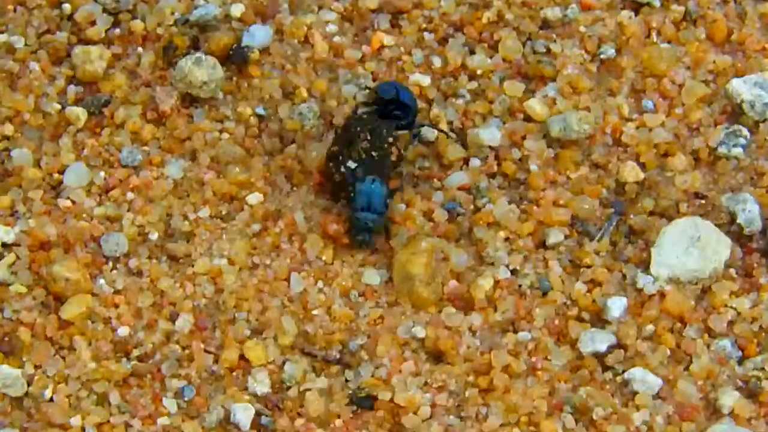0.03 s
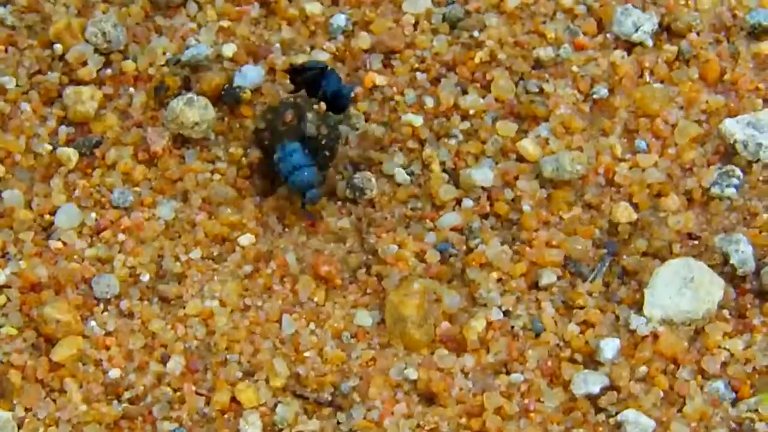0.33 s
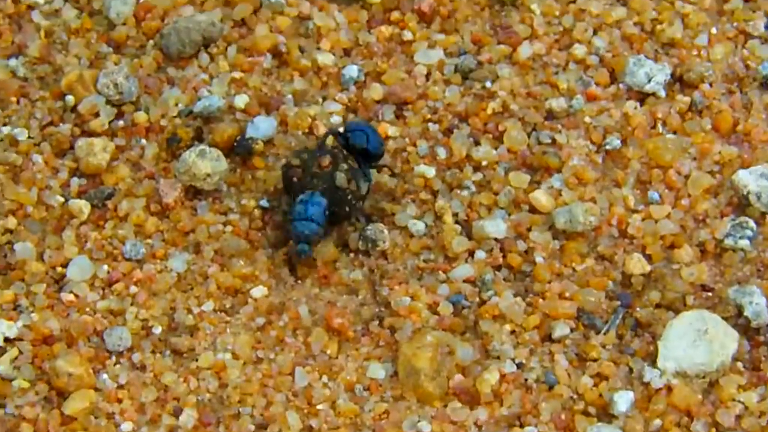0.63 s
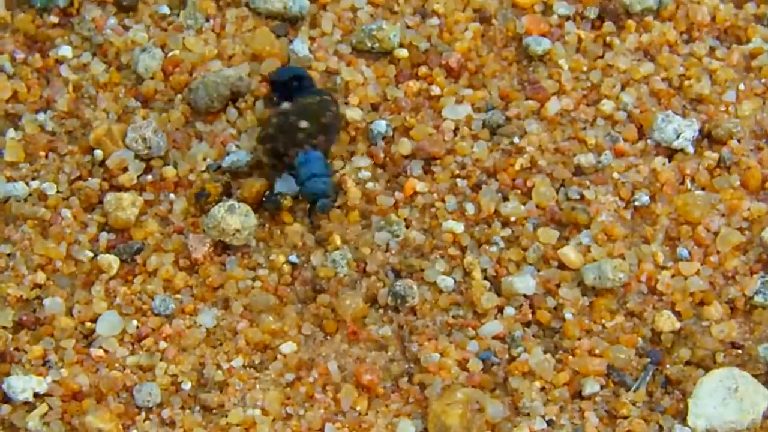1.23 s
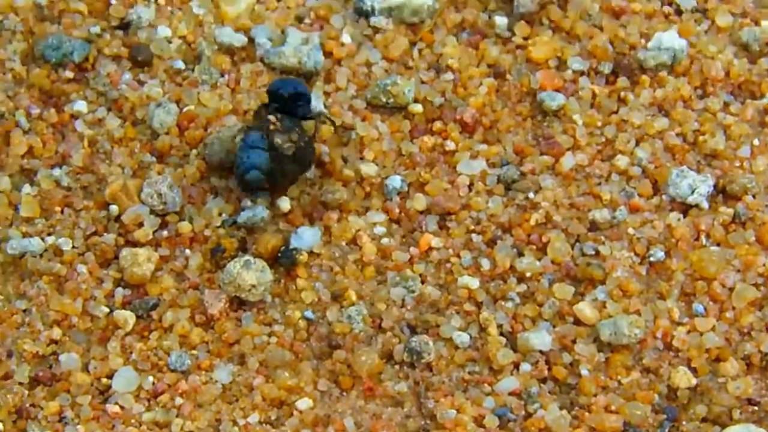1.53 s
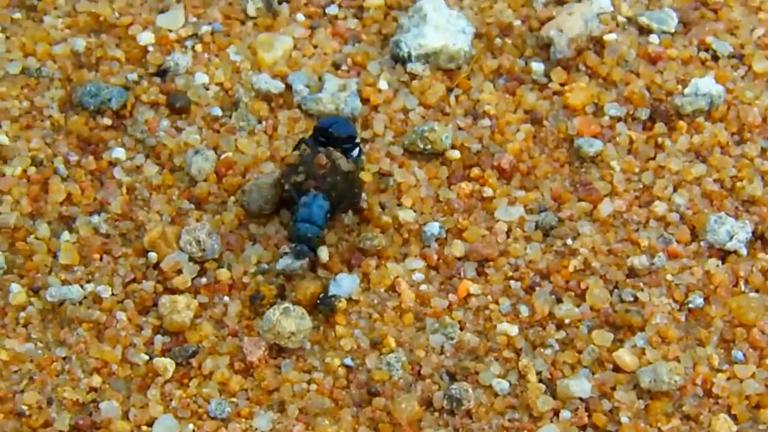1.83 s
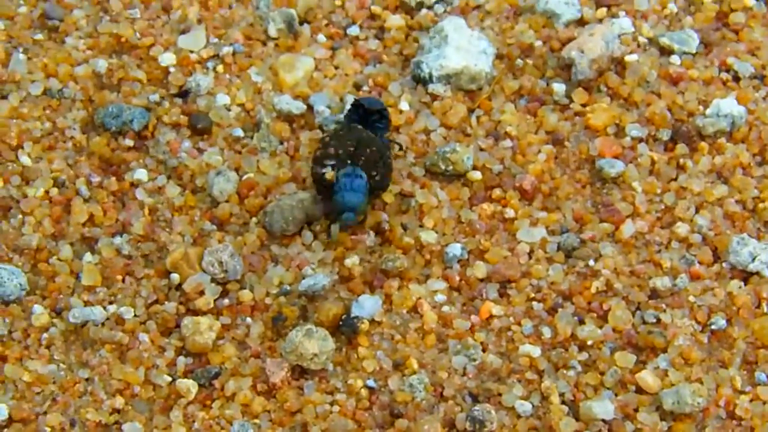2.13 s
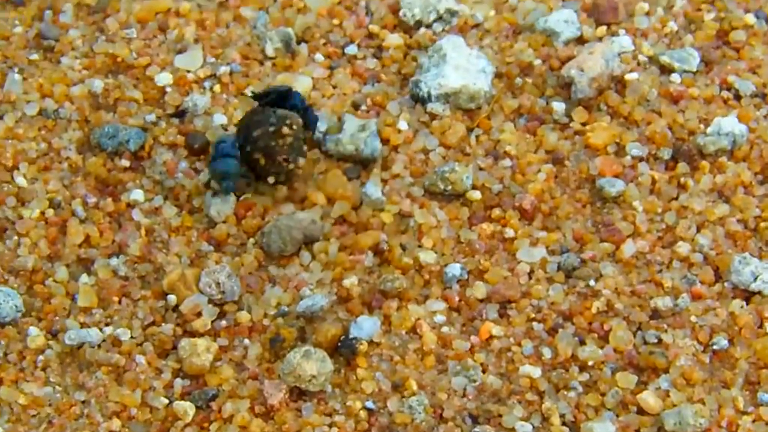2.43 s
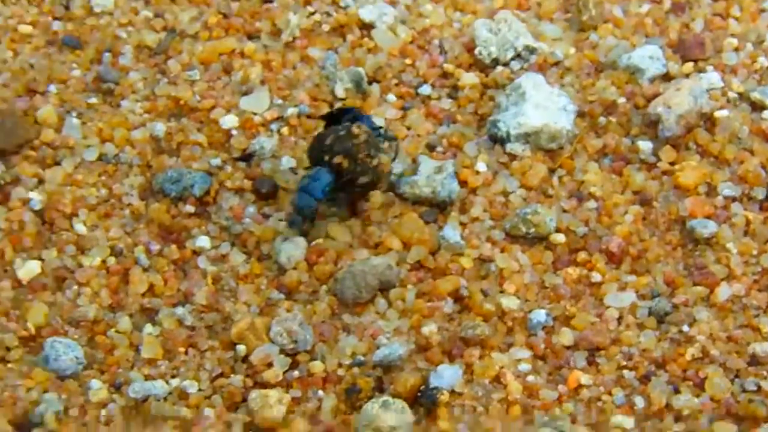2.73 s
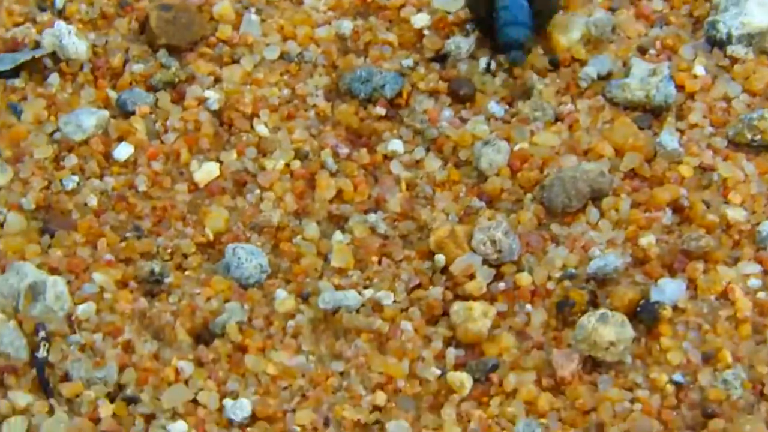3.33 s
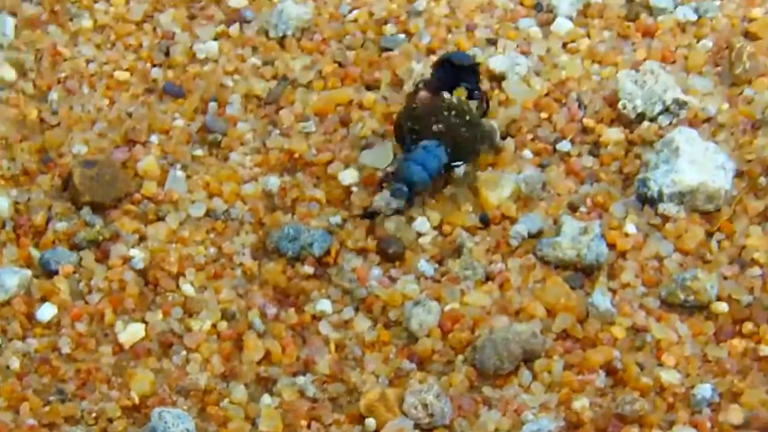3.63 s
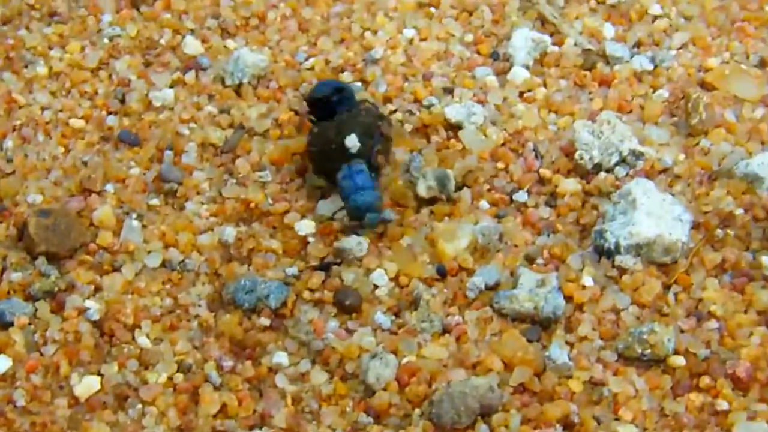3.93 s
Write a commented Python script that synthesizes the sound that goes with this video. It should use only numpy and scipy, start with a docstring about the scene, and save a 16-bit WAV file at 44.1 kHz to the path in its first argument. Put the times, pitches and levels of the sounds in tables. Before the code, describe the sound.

Handling noise rustles and snaps twice near the microphone, then faint insects and bird chirps remain.

```python
"""A hand rubs twice over a casing near the microphone, outdoors and close to sandy ground: tiny slips
make a gritty rustle, and the casing rings with sharp snaps as the grip catches and lets go.
Around it lie quiet air, a steady insect chorus, thin runs of ticks, a small bird's chirps and a far
bird's piping. Near the end a breeze rises and two soft bumps reach the single microphone."""
import sys
import numpy as np
from scipy import signal
from scipy.fft import rfft, irfft
from scipy.io import wavfile

SR = 44100
rng = np.random.default_rng(int(sys.argv[2]) if len(sys.argv) > 2 else 0)


def generate_wav(signal):
    """Clip the signal to [-1, 1] and save it as 16-bit WAV at the path in sys.argv[1]."""
    frames = np.transpose(np.atleast_2d(signal))
    scaled = np.clip(frames, -1, 1) * 32767
    pcm = np.round(scaled).astype(np.int16)
    wavfile.write(sys.argv[1], SR, pcm)


N = 176400
T = np.arange(N) / SR

# spectrum of the open air: frequency_hz, relative_db
AIR_COLOUR = [(12, -13.5), (22, -1), (35, 1), (55, -3.5), (100, -3), (180, -6), (280, -10), (400, -13),
              (550, -15.5), (850, -18), (1400, -21.5), (1900, -24.5), (3000, -26), (4000, -28),
              (5400, -24.5), (6300, -27.5), (7200, -30.5), (9600, -31.5), (16000, -35.5)]
# slow swells of the air's low murmur: time_s, level_db
MURMUR_LEVEL = [(0, -67), (.6, -58), (1.0, -62.5), (1.5, -53.5), (1.95, -58), (2.3, -71), (2.85, -57.5),
                (3.3, -57.5), (4, -64)]
# spectrum of the murmur: frequency_hz, relative_db
MURMUR_COLOUR = [(20, -13), (70, -0.5), (170, 0), (300, -6.5), (600, -18), (1500, -45)]
# rumble of the breeze: time_s, level_db
BREEZE_LEVEL = [(0, -68), (3.2, -63.5), (3.6, -51.5), (3.8, -46.5), (3.89, -41), (4, -53)]
# spectrum of the breeze: frequency_hz, relative_db
BREEZE_COLOUR = [(6, -27), (16, -7.5), (33, 2), (80, -4.5), (160, -23), (500, -58)]
# tones of the far insects, before the swell: pitch_hz, level_db
INSECT_TONES = [(5030, -80), (5215, -72), (5325, -83), (5385, -79.5), (5450, -73), (5511, -70.5),
                (5573, -73), (5690, -78.5), (6060, -76.5), (6320, -79.5)]
# swell of the whole chorus: time_s, gain_db
CHORUS_SWELL = [(0, -16), (1.0, 1), (1.4, 1.5), (2.2, -1.5), (3.2, 2.5), (3.7, -2.5), (4, -2)]
# thin tone of the nearest insect: time_s, level_db
NEAR_INSECT_LEVEL = [(0, -72), (.9, -62), (1.05, -64), (1.25, -63.5), (1.35, -72), (1.7, -68), (2.2, -69.5),
                     (2.7, -69), (3.15, -68), (3.4, -74), (4, -77)]
# falling notes of the far bird: start_s, length_s, first_hz, last_hz, level_db
PIPING_NOTES = [(1.32, .04, 1393, 1300, -62), (1.575, 0.039, 1180, 1045, -59),
                (1.615, 0.023, 1454, 1330, -59), (1.65, .035, 1500, 1300, -62),
                (1.712, 0.034, 1470, 1290, -60), (1.765, .03, 1414, 1270, -60),
                (1.815, 0.029, 1367, 1244, -60), (1.858, 0.025, 1390, 1330, -62),
                (2.03, 0.049, 1180, 1080, -55.5), (2.934, 0.031, 1170, 1090, -58),
                (3.15, .03, 1340, 1280, -62), (3.235, 0.029, 1370, 1300, -62),
                (3.29, 0.038, 1425, 1300, -60.5), (3.35, 0.05, 1460, 1310, -60.5),
                (3.41, 0.032, 1514, 1396, -59), (3.455, 0.04, 1514, 1450, -63),
                (3.51, .035, 1580, 1490, -67), (3.56, 0.031, 1526, 1390, -59),
                (3.607, .033, 1450, 1365, -58.5), (3.65, 0.041, 1453, 1286, -60),
                (3.69, 0.026, 1420, 1330, -59), (3.738, .038, 1363, 1310, -60)]
# slurred notes of the small bird: start_s, length_s, first_hz, last_hz, level_db
CHIRP_NOTES = [(.144, 0.004, 4000, 3660, -46.5), (.150, 0.026, 3450, 3450, -52),
               (.194, 0.021, 3530, 3390, -56), (.218, .05, 3480, 3100, -63),
               (2.7525, 0.027, 3950, 3343, -38.5), (2.782, 0.0083, 3680, 3300, -42),
               (2.791, 0.013, 3140, 3390, -49), (2.8055, 0.011, 3970, 3430, -39.5),
               (2.821, 0.0047, 3770, 3270, -41), (2.827, 0.0062, 3070, 3400, -47),
               (2.8345, 0.0045, 3650, 3170, -47), (2.84, 0.015, 3150, 3120, -53),
               (2.85, 0.036, 3120, 2900, -56.5)]
# dry ticks in short runs: centre_s, relative_db
TICKS = [(1.097, -46), (1.132, -41.5), (1.167, -49), (1.202, -46), (1.243, -46), (1.862, -46.5),
         (1.8985, -44), (1.9352, -41.5), (1.97, -41.5), (1.999, -40.5), (2.026, -43), (2.050, -46),
         (2.742, -46), (2.780, -43), (2.816, -47), (3.332, -47), (3.387, -51), (3.461, -44.5), (3.500, -41),
         (3.5353, -40.5), (3.569, -45)]
# spectrum of the ticks: frequency_hz, relative_db
TICK_COLOUR = [(3000, -26), (6000, -3.5), (9500, -1), (13000, -5), (16000, -11.5)]
# bumps on the microphone: centre_s, pitch_hz, width_s, peak_db
BUMPS = [(3.849, 48, 0.0038, -25.5), (3.94, 81, 0.0043, -31)]
# ringing modes of the casing: pitch_hz, relative_db, t60_s
CASING_MODES = [(2930, -6.5, 0.0055), (3470, 2, 0.0047), (4300, 4.5, 0.0032), (5450, -8, 0.0023),
                (6020, 8.5, 0.0022), (9700, 1, 0.0017), (12000, -17, 0.00089)]
# snaps of the grip: start_s, ring_peak_db, tilt_db_per_octave, pitch_ratio
SNAPS = [(0.1744, -34, -14, 0.88), (.1795, -36.5, -12, 0.81), (.2400, -39, -7, 0.65), (0.2623, -42, 9, 1.2),
         (.2880, -31.5, 7, 1.1), (.2991, -29.5, 25, 0.95), (0.3048, -39, 9, 1), (0.34, -27, 15, 1),
         (0.3582, -16, -1, 0.923), (0.4188, -32, 2, 1.3), (.4807, -27.5, -9, 1), (0.511, -30, 8, 1),
         (0.514, -28, 7, 1.1), (0.5175, -27, 3, 2.1), (0.52, -21.5, -5, 1.56), (.5365, -34, 8, 1.2),
         (.6990, -20, -2, .95), (.7101, -21.5, -1, 1.1), (0.7352, -26, -5, 1.1), (.7400, -29, 0, 0.94),
         (0.7637, -25.5, -7, 0.95), (0.7965, -16, -0.5, 1.05), (0.8002, -21.5, -3, 1.05),
         (0.824, -31, -5, .85), (0.8276, -21, -12, 0.91), (.8393, -13, 1, 5), (0.8424, -28, 2, 1),
         (0.8966, -22.5, 0, 1.1), (.9117, -18, 1, 9), (.9172, -23, -4, 1), (0.9255, -27, -6, 0.81),
         (0.9295, -18, -4, 1), (.9460, -21, 2, 0.93), (0.9653, -36, -13, 0.58), (1.028, -37.5, 0, 1.5),
         (1.4145, -37, -1, 0.77)]
# pressure of the hand, heard as loudness: time_s, level_db
RUB_PRESSURE = [(.12, -68), (.23, -53), (.34, -53.5), (.385, -49), (.41, -44.5), (.45, -46.5), (.48, -44.5),
                (.61, -40.5), (.635, -43), (.655, -57), (.69, -57), (.73, -46.5), (.78, -47), (.83, -39),
                (.87, -43), (.925, -38), (.96, -54), (1.03, -55.5), (1.12, -75)]
# spectrum of the rubbing: frequency_hz, relative_db
RUB_COLOUR = [(500, -55), (1200, -8), (2200, -3), (2700, 1), (3300, 3), (4800, 0), (6500, 1.5),
              (10000, 0.5), (12500, -4.5), (16000, -5.5)]
# treble of the rubbing, brightest in the first stroke: time_s, gain_db
RUB_TREBLE = [(.25, -2.5), (.42, 6), (.48, 1.5), (.62, -2), (.72, -2.5), (.93, -5.5)]


def undb(db):
    """Decibels to gain."""
    return 10 ** (np.asarray(db) / 20)


def unit(x):
    """Scale to rms 1."""
    return x / np.sqrt(np.mean(x ** 2) + 1e-20)


def curve(rows):
    """Gain over time from (s, dB) points."""
    return undb(np.interp(T, *np.array(rows).T))


def colour(x, points):
    """Filter by (Hz, dB) points; rms 1."""
    hz, db = np.array(points).T
    f = np.maximum(np.fft.rfftfreq(N, 1 / SR), 1)
    return unit(irfft(rfft(x) * undb(np.interp(np.log(f), np.log(hz), db)), N))


def noise():
    """White noise."""
    return rng.standard_normal(N)


def band(hz, width_hz):
    """Noise in a bell-shaped band; rms 1."""
    bell = np.exp(-.5 * ((np.fft.rfftfreq(N, 1 / SR) - hz) / width_hz) ** 2)
    return unit(irfft(rfft(noise()) * bell, N))


def pulse(centre_s, width_s):
    """Bell-shaped envelope of a tick or a bump."""
    return np.exp(-.5 * np.minimum(((T - centre_s) / width_s) ** 2, 100))


def add(out, at, x):
    """Mix a short sound in at a time."""
    i = max(int(at * SR), 0)
    out[i:i + len(x)] += x[:max(N - i, 0)]


def open_air(whine_hz=1178):
    """All around: a wavering hush, a low murmur, a breeze rising at the end and a faint steady whine."""
    hush = colour(noise(), AIR_COLOUR) * undb(-49.5 + .59 * band(0, 1))
    breeze = colour(noise(), BREEZE_COLOUR) * curve(BREEZE_LEVEL)
    murmur = colour(noise(), MURMUR_COLOUR) * curve(MURMUR_LEVEL)
    whine = undb(-78) * np.sqrt(2) * np.sin(2 * np.pi * whine_hz * T)
    return hush + murmur + breeze + whine


def insects(near_hz=5149, wobble_hz=11, flutter_db=1.5):
    """Many far insects blur into wavering tones in a narrow hiss; the nearest holds one clearer tone."""
    tones = sum(undb(db) * band(hz, width_hz=10.5) for hz, db in INSECT_TONES)
    hiss = undb(-69) * band(5270, width_hz=950)
    chorus = (tones + hiss) * curve(CHORUS_SWELL)
    pitch_hz = near_hz + wobble_hz * band(0, 18.3)
    nearest = np.sqrt(2) * np.sin(2 * np.pi * np.cumsum(pitch_hz) / SR)
    flutter = undb(flutter_db * band(0, 11))
    return chorus + nearest * curve(NEAR_INSECT_LEVEL) * flutter


def bird(notes, bend, edge_s, echo_db, t60_s):
    """Trembling whistles scattered by the surroundings; more bend makes each slide level off sooner."""
    out = np.zeros(N)
    tremble = 1 + .013 * band(0, width_hz=220)
    for at, length, first_hz, last_hz, db in notes:
        t = np.arange(int(length * SR)) / SR
        slide = np.expm1(-bend * t / length) / np.expm1(-bend)
        hz = (first_hz + (last_hz - first_hz) * slide) * np.interp(at + t, T, tremble)
        gate = np.sin(np.pi / 2 * np.clip(np.minimum(t, length - t) / edge_s, 0, 1))
        add(out, at, undb(db) * gate * np.sin(2 * np.pi * np.cumsum(hz) / SR))
    echo = noise() * np.exp(-np.log(1000) * T / t60_s)
    return out + undb(echo_db) * signal.fftconvolve(out, echo / np.linalg.norm(echo))[:N]


def ticks():
    """Faint high rasps of a few milliseconds, perhaps an insect."""
    gate = sum(undb(db) * pulse(at, width_s=.0011) for at, db in TICKS)
    return undb(-5.5) * gate * colour(noise(), TICK_COLOUR)


def microphone_bumps():
    """Right on the microphone: dull pushes of about one cycle."""
    return sum(undb(db) * np.cos(2 * np.pi * hz * (T - at)) * pulse(at, width_s)
               for at, hz, width_s, db in BUMPS)


def casing_snaps(scatter=.062, rise_s=.00004, crackle_s=.0025, knock_hz=1360, knock_s=.0006):
    """Close up: each catch or release of the grip rings the casing briefly and sheds a short crackle."""
    out, t = np.zeros(N), T[:1024]
    hz, db, t60 = np.array(CASING_MODES).T[:, :, None]
    low_cut = signal.butter(3, 2330, "high", fs=SR, output="sos")
    # the mass of the first contact puts a soft knock under each snap
    knock = undb(-30) * np.sin(2 * np.pi * knock_hz * t) * np.exp(-t / knock_s)
    for at, peak_db, tilt_db, pitch_ratio in SNAPS:
        mode_hz = np.minimum(pitch_ratio * hz * (1 + scatter * rng.standard_normal(hz.shape)), SR / 2)
        envelopes = undb(db + tilt_db * np.log2(hz / hz[0])) * np.exp(-np.log(1000) * t / t60)
        ring = (envelopes * np.cos(2 * np.pi * mode_hz * t)).sum(0)
        ring = signal.sosfilt(low_cut, ring * (1 - np.exp(-t / rise_s)))
        crackle = signal.sosfilt(low_cut, rng.standard_normal(len(t))) * np.exp(-t / crackle_s)
        add(out, at, undb(peak_db) * (ring / np.abs(ring).max() + undb(-21) * crackle + knock))
    return out


def hand_rubbing(slips_per_s=2200, spread_db=3.5, treble_hz=9100):
    """Close up: dense tiny slips over a smooth sliding hiss, both following the hand's pressure."""
    slips = (rng.random(N) < slips_per_s / SR) * np.sign(noise())
    slips *= undb(spread_db * np.minimum(rng.exponential(size=N), 5))
    sliding = undb(-3) * noise()
    rub = colour(unit(slips) + sliding, RUB_COLOUR)
    treble = signal.sosfiltfilt(signal.butter(2, treble_hz, "high", fs=SR, output="sos"), rub)
    return (rub - treble + treble * curve(RUB_TREBLE)) * curve(RUB_PRESSURE)


def scene():
    """Near and far meet at one microphone by the ground, the same in both channels."""
    small_bird = bird(CHIRP_NOTES, bend=3.4, edge_s=.0018, echo_db=-15, t60_s=.39)
    far_bird = bird(PIPING_NOTES, bend=.5, edge_s=.0071, echo_db=-3.5, t60_s=.66)
    close = hand_rubbing() + casing_snaps() + microphone_bumps()
    mono = close + ticks() + small_bird + far_bird + insects() + open_air()
    return np.array([mono, mono])


def record(dry, open_s=.071, notch_hz=7830, top_hz=15750):
    """The microphone input opens after a moment, has a narrow notch in the treble and cuts the top."""
    fade_in = curve([(open_s - .011, -48), (open_s - .007, -26), (open_s - .001, -18),
                     (open_s + .00073, 0)])
    notched = signal.lfilter(*signal.iirnotch(notch_hz, Q=19.2, fs=SR), dry * fade_in)
    return signal.sosfilt(signal.ellip(12, .2, 70, top_hz, fs=SR, output="sos"), notched)


dry = scene()
out = record(dry)
generate_wav(out)
```